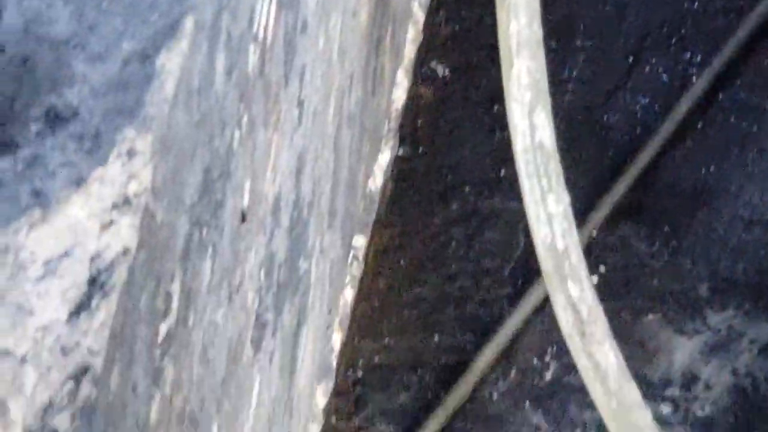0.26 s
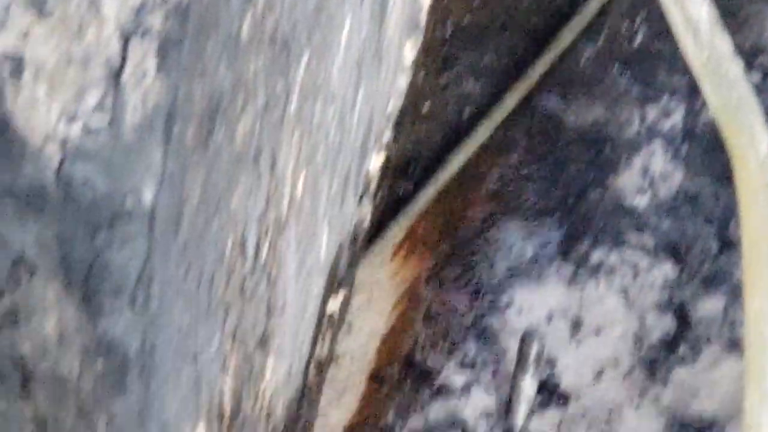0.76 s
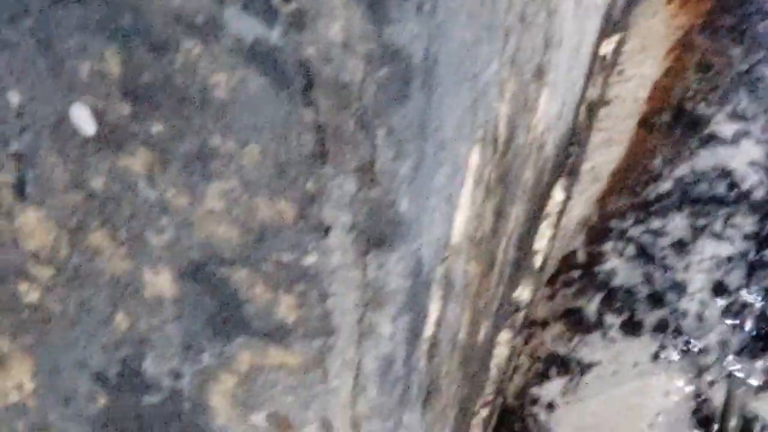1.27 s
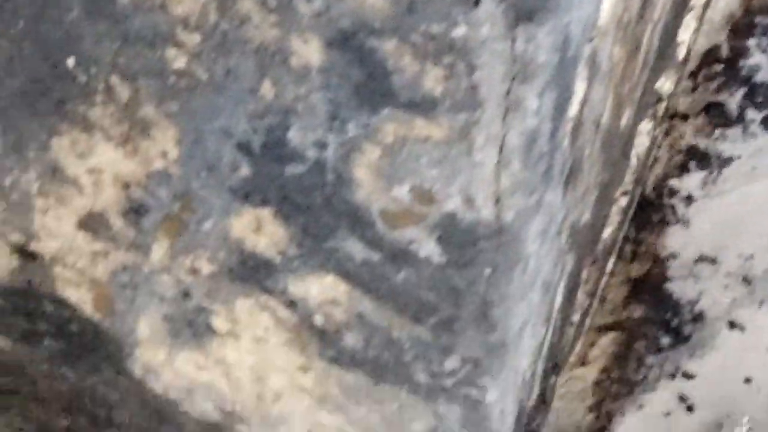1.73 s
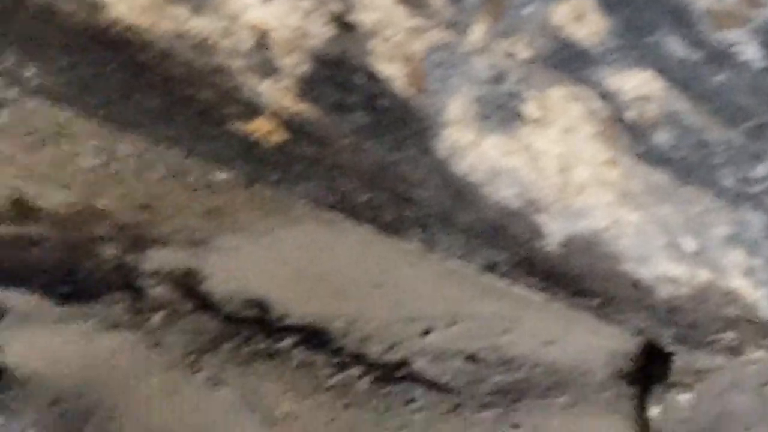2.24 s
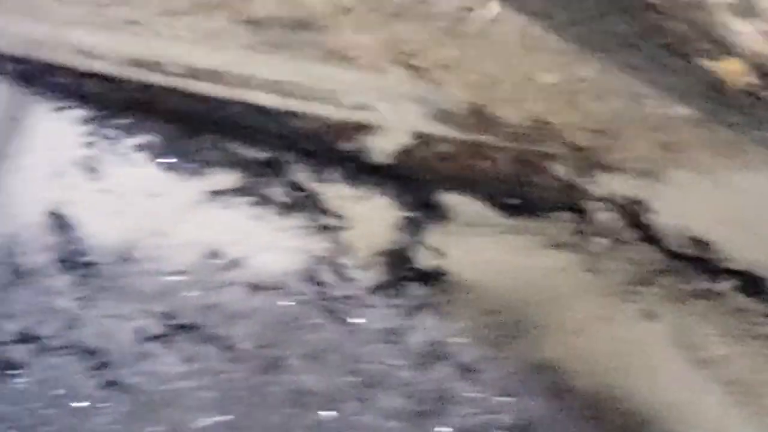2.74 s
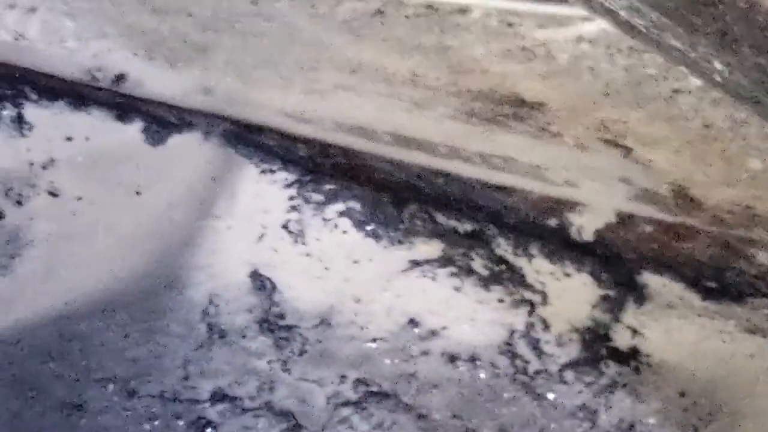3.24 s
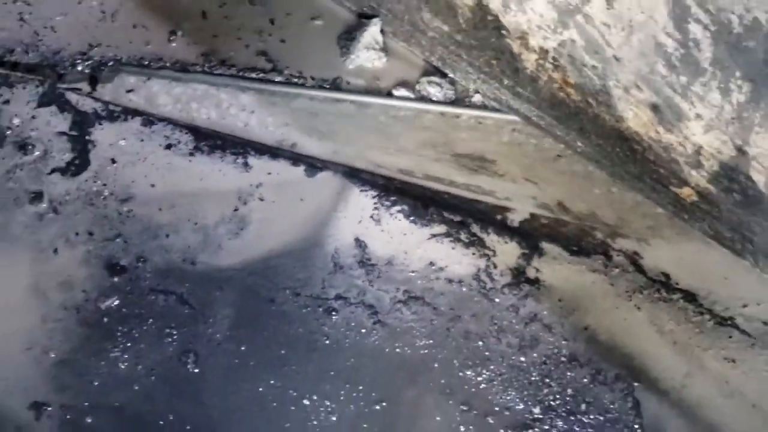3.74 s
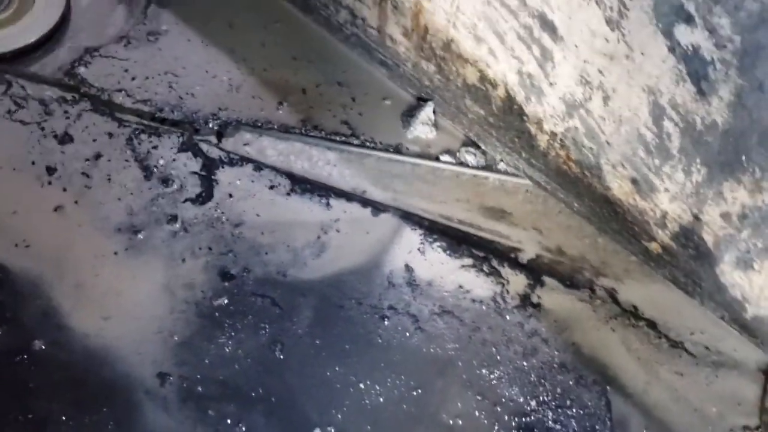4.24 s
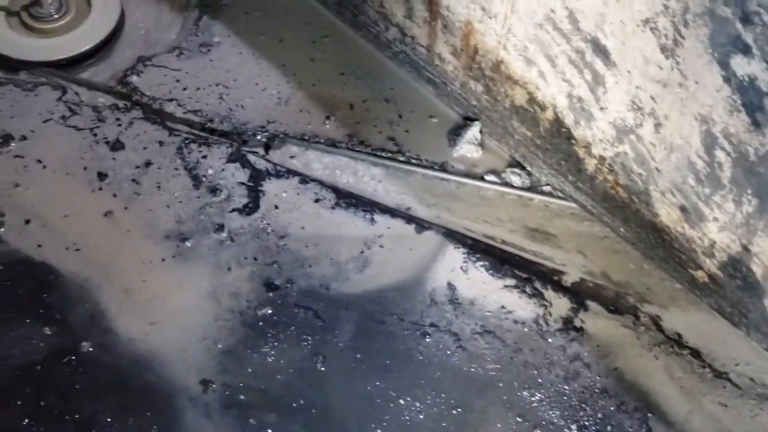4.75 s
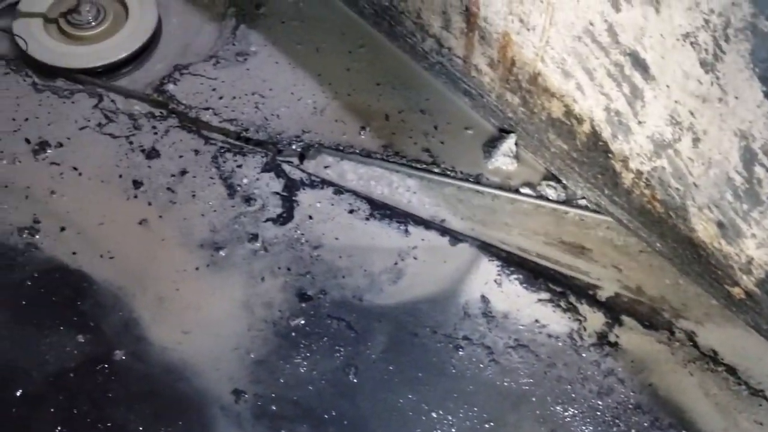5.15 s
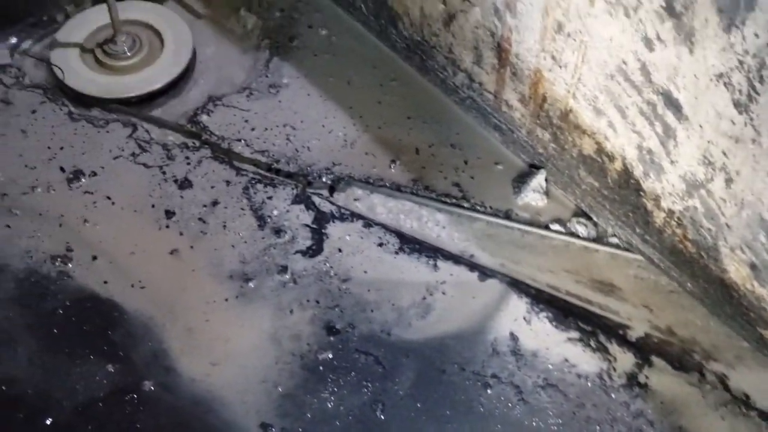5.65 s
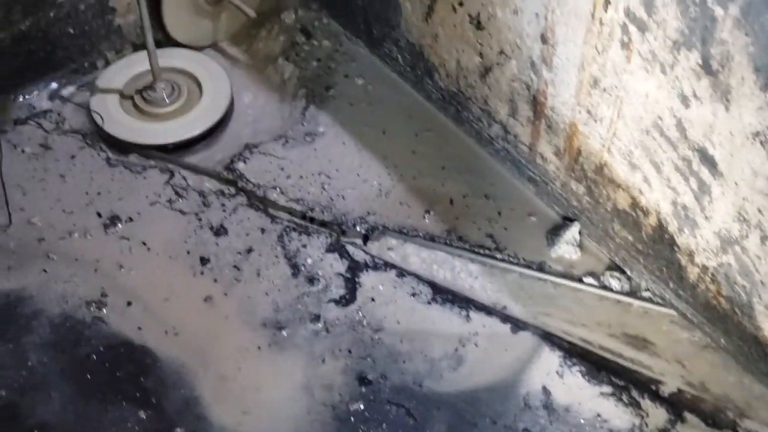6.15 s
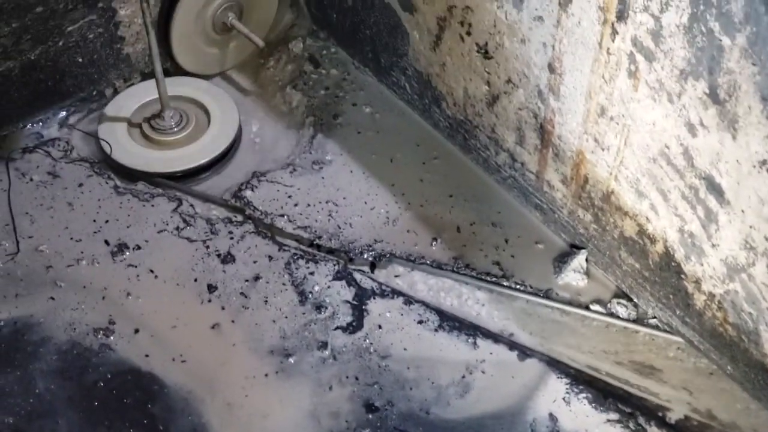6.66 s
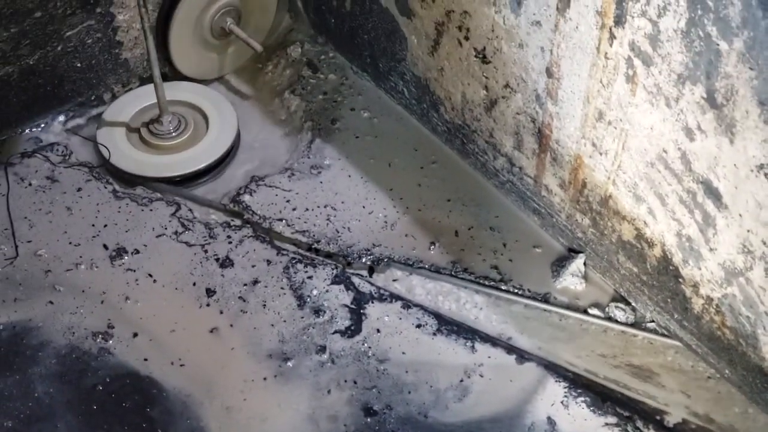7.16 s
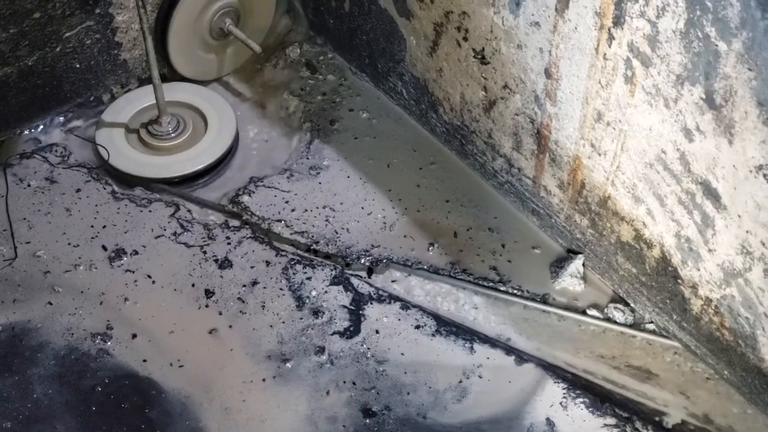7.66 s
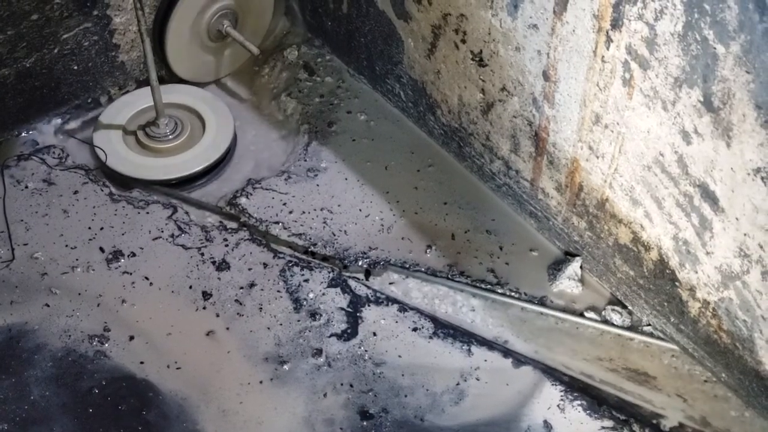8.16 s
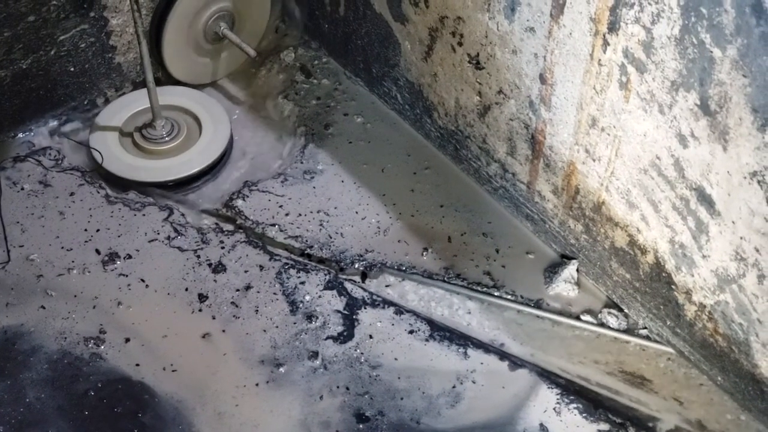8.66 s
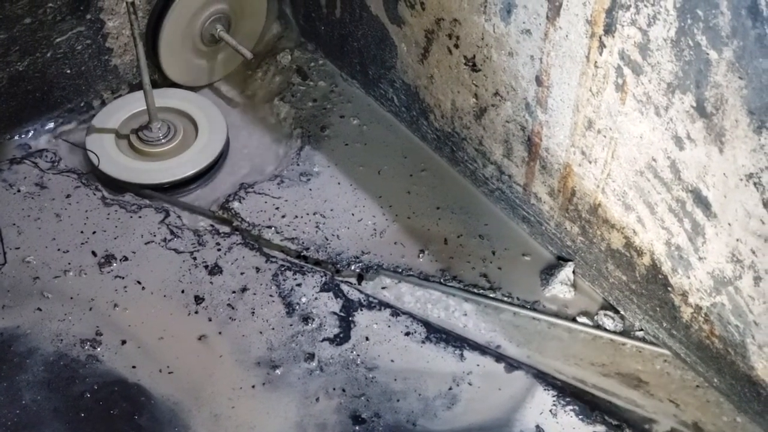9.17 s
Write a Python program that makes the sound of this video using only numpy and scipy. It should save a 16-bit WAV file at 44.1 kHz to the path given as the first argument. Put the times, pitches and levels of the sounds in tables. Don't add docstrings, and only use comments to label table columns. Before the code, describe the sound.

A wire saw runs without pause in a concrete pit. Dense, bright gritty hiss and water spray dominate, over a rougher midrange grind. A thin throbbing hum from the moving wire and ringing steel pulleys sit inside it, with pump hum and low rumble underneath. Handheld stereo microphones turn, subtly shifting the tone and width; tiny dips pass quickly.

```python
import sys
import numpy as np
from scipy import signal
from scipy.fft import rfft, irfft, next_fast_len
from scipy.io import wavfile
from scipy.ndimage import uniform_filter1d

SR = 44100
rng = np.random.default_rng(int(sys.argv[2]) if len(sys.argv) > 2 else 0)


def voltage_ratio(decibels):
    exponent = np.asarray(decibels, float) / 20
    return 10 ** exponent


def wav_record(signal):
    frames = np.transpose(np.atleast_2d(signal))
    bounded = np.clip(frames, -1, 1)
    quanta = np.round(bounded * 32767).astype(np.int16)
    wavfile.write(sys.argv[1], SR, quanta)


N = 414540

# f/Hz, level/dB [per Hz]
GRIND_COLOUR = [(400, -63), (620, -16.5), (690, -14), (745, -5), (900, -2.5), (960, -5), (1240, -4),
                (1450, -0.5), (1750, -3), (2150, -3), (2450, -10), (2900, -14), (3600, -26), (5000, -70)]
# f/Hz, level/dB [per Hz]
HISS_COLOUR = [(1200, -60), (2000, -19.5), (2600, -8), (3300, -0.5), (3900, 2), (4600, 3), (5100, 0),
               (6800, -0.5), (7900, -2), (8300, -33), (9000, -43), (11000, -77)]
# f/Hz, level/dB [per Hz]
SPRAY_COLOUR = [(6000, -70), (7700, -30), (8200, -1.5), (9200, -1.3), (10500, -.3), (12500, -.8),
                (12850, -2.8), (14000, -1.8), (15200, -3.6), (15650, -1.8)]
# t/s, level/dB
FEED_PRESSURE = [(0, 0), (1.8, -0.1), (2.7, -0.2), (3.3, 0), (3.9, 1), (5.3, 0.4), (5.6, 0.36), (7.1, 1.5),
                 (7.55, 1.9), (8, 0.7), (9.4, 0.5)]
# t/s, depth/dB, half length/s
WIRE_SLIPS = [
    (1.645, 0.5, .04),
    (2.912, 2.5, .03),
    (3.05, 1, 0.027),
    (4.405, 3, 0.028),
    (5.53, 1.5, 0.028),
    (5.68, 1, 0.023),
    (6.0, 1, .03),
    (6.503, 1, 0.033),
    (7.708, 2.6, 0.11),
    (9.15, 2, .04),
]
# t/s, share [0-1]
FACING_CUT = [
    (0, 0.6),
    (.8, 0.4),
    (2.9, 0.37),
    (3.4, 1),
    (5, 1),
    (6, 0.67),
    (7.4, 0.4),
    (8, 0.3),
    (9.4, 0.55),
]
# f/Hz, share [0-1]
FACING_AWAY_LOSS = [(4500, 0), (5500, .2), (8000, .2), (9000, .08), (12500, .08), (12900, .32),
                    (15700, .32)]

STRAND_HZ = 1105.3, 1108.75
# t/s, centre level/dB, width level/dB
BEAD_LEVELS = [
    (0, -44, -50),
    (1, -41, -42),
    (2, -37, -36),
    (3.4, -36, -42),
    (6, -39, -43),
    (7, -44, -42),
    (9.4, -41, -41),
]
# before the turn (centre level/dB, width level/dB), then the same after it
BEAD_SIDEBANDS = [((-43, -47), (-49, -35)), ((-44, -44), (-49, -38))]
MICS_TURN = 2.5, 5

# t/s, level/dB, wide share [0-1]
FRAME_RING = [
    (0, -30.5, 0.8),
    (.8, -29, .6),
    (1.75, -26, 0.1),
    (2.3, -33, 0.4),
    (2.7, -31.5, 0.95),
    (3.7, -27, .85),
    (4.6, -33, 0.7),
    (5.2, -32, 0.54),
    (9.4, -31.5, 0.47),
]
# f/Hz, width/Hz, level/dB, heard from t/s, heard to t/s
STEEL_MODES = [(564, 1.5, -49, 3.4, 5.8), (777, 16, -45, -1, 11), (850, 70, -37, 2.5, 11),
               (1112, 90, -37, -1, 6.5), (1112, 90, -39, 6.2, 11), (1395, 55, -37, 3.5, 7.6),
               (1842, 5, -39, -1, 1.6), (1920, 200, -35, -1, 1.6), (1900, 110, -39, 1.4, 11),
               (4300, 800, -33, -1, 2.2), (5400, 180, -41, 3.2, 4.8), (6250, 180, -38, 5.2, 11),
               (7950, 220, -38, -1, 1.1), (10650, 260, -37.5, 4.3, 11), (11900, 200, -39.5, 1.6, 3.3),
               (12680, 130, -39, -1, 6.2), (14030, 130, -39.5, 5.8, 11), (14930, 140, -41, 6.3, 11)]

FLYWHEEL_TONES = 16.02, [(32, -54, -65), (41, -60, -67), (46, -43, -51), (54, -44, -55), (59, -57, -49),
                  (61, -52, -50), (63, -53, -58), (65, -50, -46), (101, -50, -47), (115, -46, -39),
                  (138, -46, -54), (184, -55, -53)]
IDLER_TONES = 369.6, [(1, -54, -64), (2, -54, -57), (4, -47, -40)]
GUIDE_WHEEL_TONES = 363.25, [(4, -50, -49), (5, -50, -49)]
PUMP_TONES = 56.4, [(5, -50, -74), (6, -53, -68), (8, -52, -65), (10, -50, -61), (15, -47, -54),
              (16, -50, -53)]
GENERATOR_TONES = 59.3, [(2, -61, -72), (3, -59, -77), (4, -57, -73), (10, -48, -65)]
BEARING_TONES = 1, [(478.6, -59, -70), (557.6, -59, -65), (696.1, -56, -58), (722, -55, -60),
                 (812.1, -47, -53), (836.3, -49, -57), (934.1, -49, -57)]
# f/Hz, level/dB [per Hz]
RUMBLE_COLOUR = [(15, -34), (30, -14), (55, -4.5), (90, -4), (170, -1), (267, -1.5), (410, -5.5),
                 (560, -1.5), (660, -10), (900, -38), (1500, -80)]
# t/s, position [cells]
MIC_PATH = [(0, 0), (1.9, 1.5), (3.3, 5), (4.5, 7), (6.2, 8.3), (9.4, 9)]

MIC_SPACING_M = .135
ECHO_FROM_HZ = 1700
CUT_ECHO, STEEL_ECHO = .38, .65
GRIND_DB, HISS_DB, SPRAY_DB = -22.5, -18.5, -19.5
GRIND_GROWS, SPRAY_GROWS = 1.13, .8
SPRAY_FACING_DB = 1.1
LEFT_DB, LEFT_DRIFT_DB_PER_S = 1.6, -0.04
THROB_S = .262
WHEEL_HZ = 9.65
RUMBLE_DB = -39
TOP_HZ = 15735


def unit(x):
    return x / np.sqrt(np.mean(x ** 2) + 1e-20)


def along(points, hz):
    f, v = np.transpose(points)
    return np.interp(np.log(hz + 1), np.log(f + 1), v)


def curves(rows):
    s, *cols = np.transpose(rows)
    return [np.interp(np.arange(N) / SR, s, c) for c in cols]


def wobble(rate):
    knots = rng.standard_normal(int(N * rate / SR) + 2)
    return np.interp(np.arange(N) * rate / SR, np.arange(len(knots)), knots)


def filtered(x, response):
    m = next_fast_len(N + 8192)
    spectrum = rfft(x, m) * response(np.fft.rfftfreq(m, 1 / SR))
    return irfft(spectrum, m)[..., :N]


def echoes(bins, frames):
    cells = rng.standard_normal((4, bins, int(MIC_PATH[-1][1]) + 3))
    cells = uniform_filter1d(cells, size=3, axis=1)
    at = np.interp(np.linspace(0, N / SR, frames), *np.transpose(MIC_PATH))
    k, part = at.astype(int), (at % 1) * np.pi / 2
    comb = cells[..., k] * np.cos(part) + cells[..., k + 1] * np.sin(part)
    comb = comb[:2] + 1j * comb[2:]
    return comb * np.abs(comb) ** -.5 / np.sqrt(np.mean(np.abs(comb)))


def scattered(direct, echo, patchy_db):
    z = signal.stft(rng.standard_normal((4, N)), nperseg=512)[2]
    field = rng.standard_normal(z.shape[1:])
    field = uniform_filter1d(field, size=4, axis=0)
    field = uniform_filter1d(field, size=4, axis=1)
    z = np.concatenate([z[:3], z[3] * echoes(*field.shape)])
    noise = signal.istft(z * voltage_ratio(patchy_db * unit(field)), nperseg=512)[1][:, :N]

    def straight(hz):
        return np.clip(direct, 0, .3) * hz ** 4 / (hz ** 4 + 1100 ** 4)

    def walls(hz):
        return echo * hz ** 4 / (hz ** 4 + ECHO_FROM_HZ ** 4)

    def spread(hz):
        turn = np.arccos(.99 * np.sinc(2 * hz * MIC_SPACING_M / 343)) / 2
        return np.sqrt(1 - straight(hz) - walls(hz)) * [np.cos(turn), np.sin(turn)]

    def from_side(hz):
        lag = np.exp(-1j * np.pi * hz * MIC_SPACING_M * 1.04 / 343 * np.array([[1], [-1]]))
        return np.sqrt(straight(hz)) * lag

    mid, side = filtered(noise[:2], spread)
    beam = filtered(noise[2], from_side)
    bounced = filtered(noise[3:], lambda hz: np.sqrt(walls(hz)))
    return np.array([mid + side, mid - side]) + beam + bounced


def tone(turns, centre_db, width_db):
    mid = voltage_ratio(centre_db + 2) * np.sin(2 * np.pi * turns)
    side = voltage_ratio(width_db + 3.5) * np.cos(2 * np.pi * turns)
    return np.array([mid + side, mid - side])


def feed():
    t = np.arange(N) / SR
    slips_db = sum(db * np.exp(-((t - s) / half) ** 2) for s, db, half in WIRE_SLIPS)
    return curves(FEED_PRESSURE)[0] - slips_db


def cut():
    t, feed_db, facing = np.arange(N) / SR, feed(), curves(FACING_CUT)[0]
    noise = scattered(direct=0.084, echo=CUT_ECHO, patchy_db=2.0)
    colours = GRIND_COLOUR, HISS_COLOUR, SPRAY_COLOUR
    grind, hiss, spray = (unit(filtered(noise, lambda hz: voltage_ratio(along(c, hz)))) for c in colours)
    grind_db = GRIND_DB + GRIND_GROWS * feed_db + 1.15 * wobble(14)
    hiss_db = HISS_DB + feed_db + .5 * wobble(16)
    spray_db = SPRAY_DB + SPRAY_GROWS * feed_db + SPRAY_FACING_DB * facing + 0.46 * wobble(20)
    surge_db = .5 * wobble(22) + .45 * wobble(60)
    pulse = 1 + .035 * np.sin(2 * np.pi * 5 * PUMP_TONES[0] * t)
    sides = voltage_ratio(np.outer([.5, -.5], LEFT_DB + LEFT_DRIFT_DB_PER_S * t))
    grind = voltage_ratio(grind_db) * voltage_ratio([[.4], [-.4]]) * grind
    hiss = voltage_ratio(hiss_db) * sides * hiss
    spray = voltage_ratio(spray_db) * voltage_ratio([[-.15], [.15]]) * spray
    bright = pulse * (hiss + spray)
    lost = filtered(bright, lambda hz: np.clip(along(FACING_AWAY_LOSS, hz), 0, 1))
    bright = bright - (1 - facing) * lost
    return voltage_ratio(surge_db) * (grind + bright)


def beads():
    turned = np.interp(np.arange(N) / SR, MICS_TURN, (0, 1))
    levels = [curves(BEAD_LEVELS)]
    for before, after in (zip(*ends) for ends in BEAD_SIDEBANDS):
        None
    levels += [[a + (b - a) * turned for a, b in zip(*ends)] for ends in BEAD_SIDEBANDS]
    t = np.arange(N) / SR - THROB_S
    song = 0
    for (centre_db, width_db), shift in zip(levels, (0, -1, 1)):
        slack = np.cumsum(.3 * wobble(3)) / SR + rng.random()
        for hz, db in zip(STRAND_HZ, (.9, .4)):
            fade_db = db + 2.7 * wobble(4) + 2.8 * wobble(18)
            turns = (hz + shift * WHEEL_HZ) * t + slack
            song = song + tone(turns, centre_db + fade_db, width_db + fade_db)
    return song


def ring(drive, hz, width):
    f = np.fft.rfftfreq(2 * drive.shape[1] - 2, 1 / SR)
    resonance = 1j * f * width / (hz * hz - f * f + 1j * f * width)
    return unit(irfft(drive * resonance ** 2)[:, :N])


def pulleys():
    chatter = scattered(direct=0.26, echo=STEEL_ECHO, patchy_db=-0.3)
    drive = rfft(chatter, 2 * next_fast_len(N // 2 + SR, real=True))
    t = np.arange(N) / SR
    frame_db, wide = curves(FRAME_RING)
    one, other = ring(drive, 3640, 120)
    mid = np.sqrt(np.clip(1 - wide, 0, 1)) * one
    side = np.sqrt(np.clip(wide, 0, 1)) * other
    steel = voltage_ratio(frame_db + 3.5 * wobble(28)) * np.array([mid + side, mid - side])
    for hz, width, db, start, end in STEEL_MODES:
        heard = np.clip(np.minimum(t - start, end - t) / 0.14, .15, 1)
        steel += heard * voltage_ratio(db + 2.2 * wobble(3)) * ring(drive, hz, width)
    return steel


def pump():
    tones = np.zeros((2, N))
    for shaft_hz, orders in (FLYWHEEL_TONES, IDLER_TONES, GUIDE_WHEEL_TONES,
                             PUMP_TONES, GENERATOR_TONES, BEARING_TONES):
        turns = np.cumsum(shaft_hz * (1 + .0003 * wobble(3))) / SR
        for k, centre_db, width_db in orders:
            flicker_db = 3.2 * min(k * shaft_hz / 800, 1) * wobble(5)
            tones += voltage_ratio(1.1 + flicker_db) * tone(k * turns + rng.random(), centre_db, width_db)
    return tones


def power_pack():
    noise = scattered(direct=0.024, echo=0, patchy_db=1.35) * voltage_ratio([[.3], [-.3]])
    return voltage_ratio(RUMBLE_DB) * unit(filtered(noise, lambda hz: voltage_ratio(along(RUMBLE_COLOUR, hz))))


def scene():
    return cut() + beads() + pulleys() + pump() + power_pack()


def top_cut(x):
    return signal.sosfilt(signal.butter(12, 17090, fs=SR, output="sos"), x)


def record(dry):
    soft = dry / (1 + np.abs(dry / .9) ** 6) ** (1 / 6)
    mix = filtered(soft, lambda hz: hz < TOP_HZ)
    return top_cut(mix)


dry = scene()
out = record(dry)
wav_record(out)
```